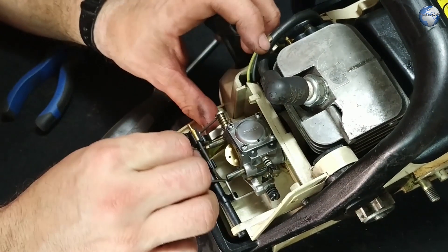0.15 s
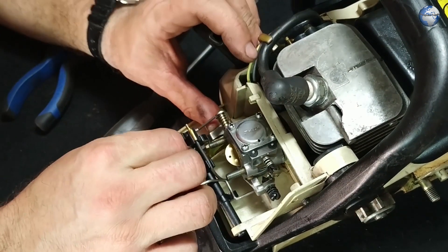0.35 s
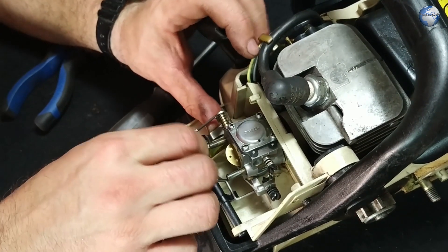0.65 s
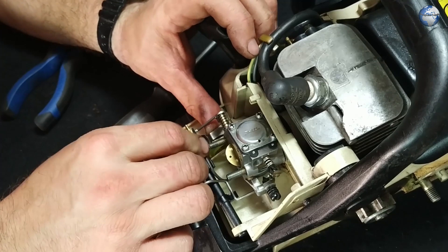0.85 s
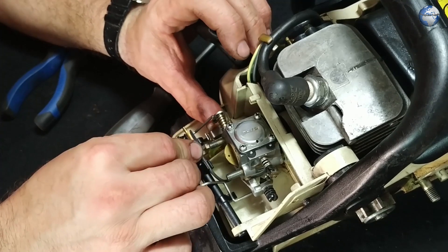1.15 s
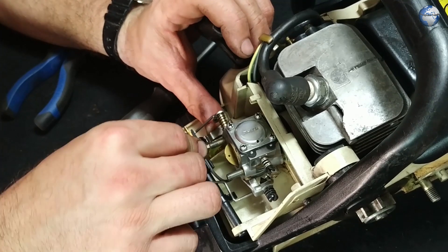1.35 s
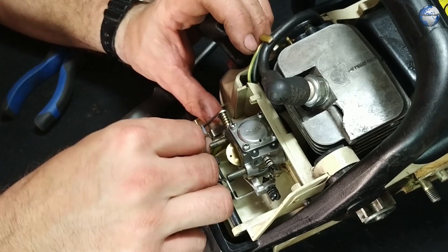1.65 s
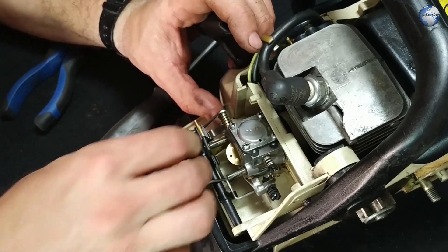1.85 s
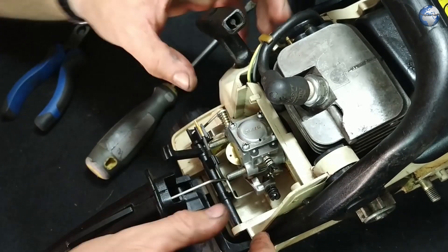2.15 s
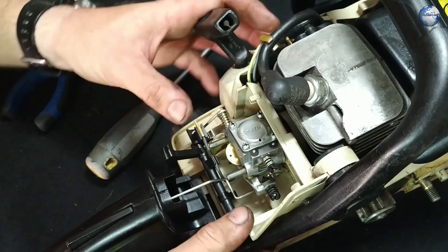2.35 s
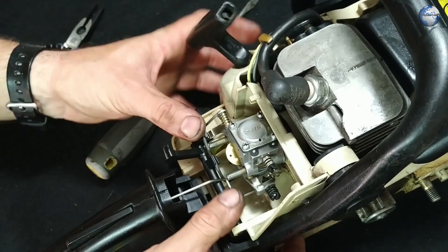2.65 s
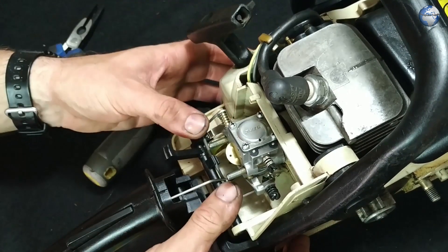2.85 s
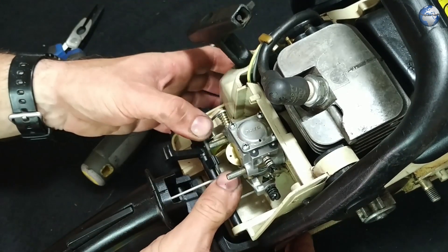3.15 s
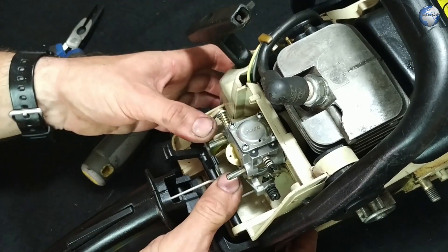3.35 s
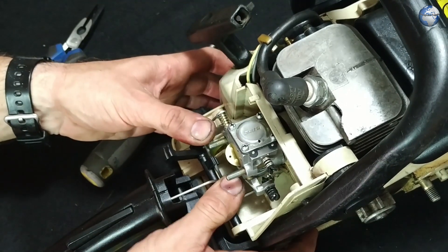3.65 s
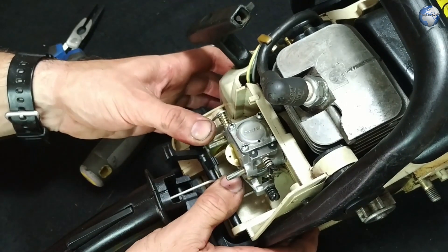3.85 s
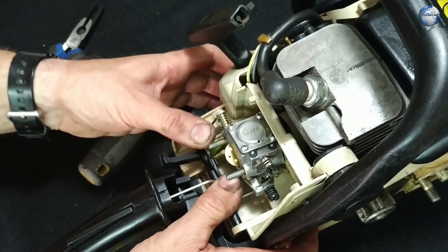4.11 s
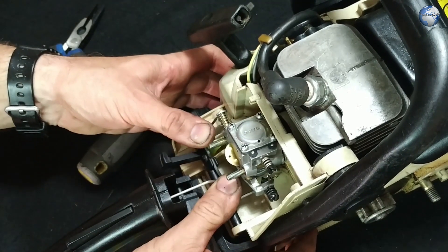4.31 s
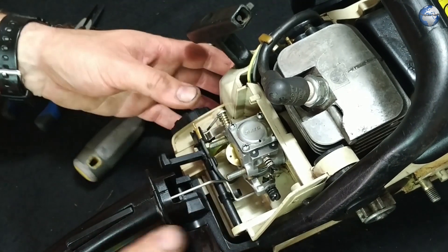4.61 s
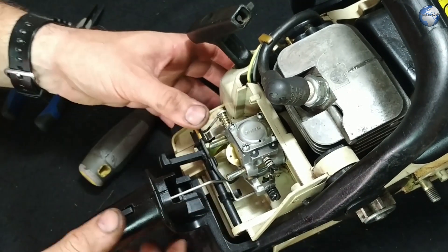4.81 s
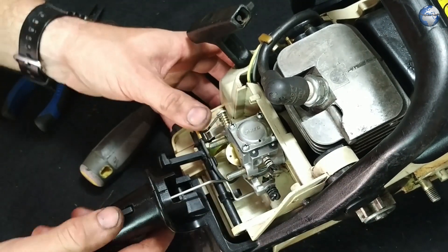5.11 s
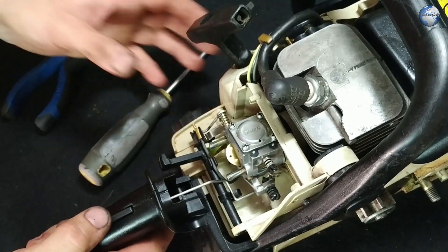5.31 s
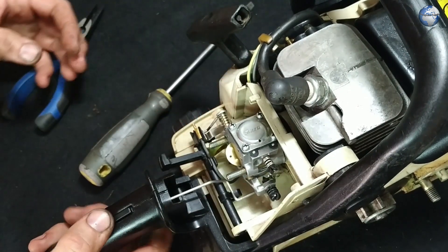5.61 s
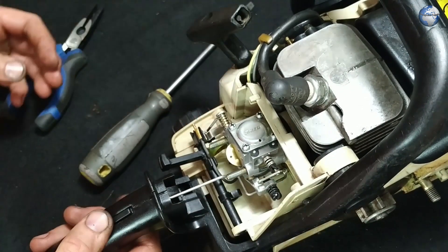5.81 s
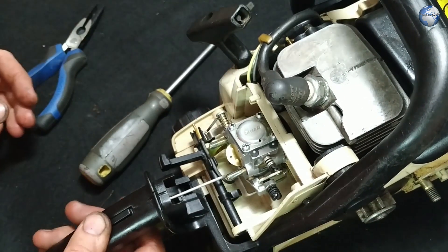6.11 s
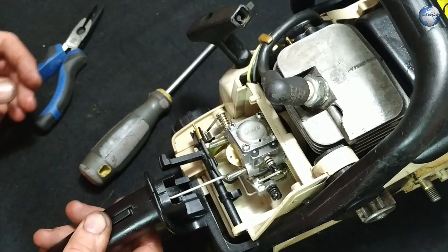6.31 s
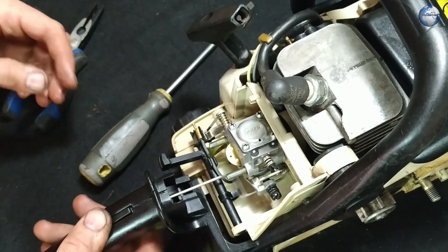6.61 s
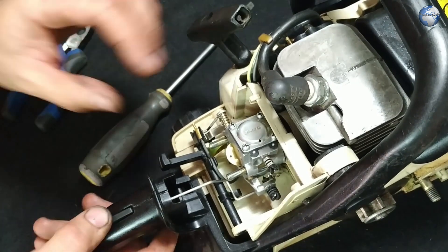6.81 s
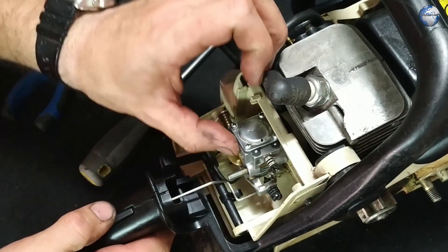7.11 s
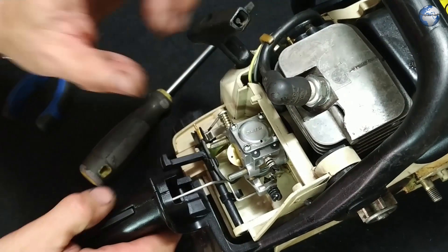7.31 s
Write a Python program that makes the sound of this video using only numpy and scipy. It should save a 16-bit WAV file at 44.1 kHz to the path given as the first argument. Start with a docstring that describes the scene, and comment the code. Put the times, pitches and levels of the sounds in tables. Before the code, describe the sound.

Hands fit small metal and plastic parts to an engine on a matted workshop bench. Crisp clicks and short scraping rattles come first, then about two seconds of faint finger rub and tiny creaks. A loud double clack with a bench thump breaks the quiet, followed by another lull and a dense run of ticks, knocks and rattles. Close stereo microphone, small room with a short echo.

```python
"""Carburettor linkage on a workshop bench

Hands fit the linkage of a small engine's carburettor on a bench mat in a small workshop.
Parts snap and tap on the plastic housing as clicks, knocks and rattles; sliding parts are dense ticks ringing
in the housing's modes. The bench booms under each blow, as noise pushes driving resonators. Fingers rub as
flickering bands of noise and creak as gliding tones; a noise suppressor lowers whatever is very quiet."""
import sys
import numpy as np
from scipy import signal
from scipy.io import wavfile
from scipy.ndimage import uniform_filter1d

SR = 44100
rng = np.random.default_rng(int(sys.argv[2]) if len(sys.argv) > 2 else 0)


def master(y):
    """Save y as 16-bit WAV."""
    cut = np.clip(np.atleast_2d(y).T, -1, 1)
    pcm = np.round(cut * 32767)  # scale
    wavfile.write(sys.argv[1], SR, pcm.astype(np.int16))


N = 328979

# Rubbing fingers and the quiet room, before flicker. Each row: time in seconds, bench rumble in dB,
# low rub in dB, high rub in dB, treble hiss in dB.
QUIET_LEVELS = [(0.0, -82, -55.5, -51.5, -48), (0.17, -90.5, -72.5, -51, -52.5),
                (0.32, -63.5, -91, -68, -72.5), (0.54, -62, -71, -65, -75.5), (0.87, -82, -69, -71, -63.5),
                (1.04, -67.5, -53, -61, -70.5), (1.35, -63, -65.5, -68.5, -69.5),
                (1.62, -51, -68, -72, -71), (1.95, -82.5, -77, -75.5, -64), (2.39, -63.5, -82, -68, -63.5),
                (2.78, -76.5, -99.5, -94, -71), (3.74, -68.5, -93, -101, -76.5),
                (4.15, -74.5, -88.5, -89.5, -74.5), (4.3, -43.5, -47.5, -39.5, -53),
                (4.61, -73.5, -63, -71, -65.5), (5.3, -70.5, -80, -88, -67), (5.88, -63, -86, -81, -75.5),
                (6.38, -57, -77, -72, -61), (6.96, -74, -67, -67, -65), (7.46, -71.5, -85, -98.5, -67.5)]
# Spectrum of the rub. Each row: frequency in Hz, relative level in dB.
RUB_SPECTRUM = [(330, -17.5), (700, -9.5), (1200, -11), (2600, 0), (5500, -9)]
# Likeness of the two microphone ports. Each row: frequency in Hz, left-right correlation.
PORT_LIKENESS = [(100, .95), (250, .85), (600, .5), (1200, 0), (12000, -.1)]
# Reverberation of the workshop. Each row: band centre in Hz, t60 in seconds, relative level in dB.
ROOM_BANDS = [(166, 0.4, 6.5), (460, 0.22, 0.5), (1010, 0.24, -5.5), (2500, .4, -9), (5840, 0.29, -3.5),
              (11300, 0.11, -1.5)]
# Modes of the bench top. Each row: frequency in Hz, relative level in dB, t60 in seconds.
BENCH_MODES = [(68.3, -6, 0.092), (82, 1.5, 0.3), (99, -7, 0.11), (139, -2.5, 0.11)]
# Modes of the engine frame on the mat. Each row: frequency in Hz, relative level in dB, t60 in seconds.
FRAME_MODES = [(82, -6.5, 0.3), (246, -12.5, 0.42), (272, -12, 0.1), (440, -3.5, 0.4), (570, -8.5, 0.06)]
# Modes of the plastic housing. Each row: frequency in Hz, relative level in dB,
# t60 in seconds (before the limit set while it is held).
HOUSING_MODES = [(696, -1, 0.052), (989, 2.5, 0.04), (1420, -4, 0.021), (1916, -6.5, 0.049),
                 (2840, -1.5, 0.0083), (6040, 1.5, 0.0044)]
# Faint creaks. Each row: start in seconds, length in seconds, first pitch in Hz, last pitch in Hz,
# level in dB before the tone and swell shape it.
CREAK_EVENTS = [(2.039, 0.054, 763, 758, -66.5), (2.409, 0.045, 680, 645, -70.5),
                (2.8, 0.12, 1144, 1327, -75.5), (2.825, 0.27, 441, 479, -71.5),
                (2.895, 0.15, 2113, 2390, -80.5), (3.188, 0.097, 945, 613, -75.5),
                (3.214, 0.071, 3020, 2650, -72), (3.243, 0.06, 2080, 1930, -79.5),
                (3.873, 0.13, 1705, 1287, -73.5), (3.878, 0.07, 716, 640, -81.5)]
# Parts sliding and rattling, one row a movement. Each row: loudest moment in seconds, level in dB,
# build-up in seconds, t60 in seconds, highs in dB re level, gain of the lows in dB.
MOVEMENTS = [(0.354, -23, 0.0019, 0.094, -18, 2.5), (0.392, -30, 0.058, 0.33, -24.5, -4.5),
             (1.059, -31.5, 0.0041, 0.055, -28, -3), (1.089, -28, 0.011, 0.29, 0, -1),
             (1.426, -30, 0.0086, 0.16, -3.5, -15.5), (0.891, -36.5, 0.004, 0.06, -4, 7),
             (1.553, -47, 0.0095, 0.2, -2, 5), (1.643, -38.5, 0.015, 0.074, -6.5, 11),
             (1.9, -59, 0.096, 0.13, 2, -16), (2.321, -61, 0.044, 1, -9, -12),
             (2.6, -87, 0.017, 0.31, 27, -8.5), (2.7, -65.5, 0.026, 0.2, 1, -5),
             (3.23, -80, 0.12, 0.46, 16.5, -1.5), (3.495, -49, 0.012, 0.21, -10, 4.5),
             (4.135, -17.5, 0.0095, 0.47, -7.5, -1), (4.19, -20, 0.036, 0.33, -6.5, -2),
             (4.869, -64.5, 0.019, 0.26, -12.5, -5), (4.98, -56, 0.0058, 0.63, -27, -24),
             (5.215, -58.5, 0.013, 0.15, -21.5, 6.5), (5.423, -37.5, 0.011, 0.18, 1, -2.5),
             (5.642, -26, 0.02, 0.14, -9, 1), (5.702, -36, 0.016, 0.26, -3, -10.5),
             (5.88, -36.5, 0.01, 0.35, 0.5, -0.5), (5.947, -33.5, 0.029, 0.065, -9, -10),
             (6.088, -29.5, 0.033, 0.18, -8, -14), (6.124, -33.5, 0.028, 0.16, 5.5, 5),
             (6.274, -35.5, 0.019, 0.11, -3, 7.5), (6.318, -37.5, 0.036, 0.11, 5, 7.5),
             (6.472, -41.5, 0.0055, 0.26, 1.5, 9), (6.537, -37, 0.031, 0.056, 3, -11),
             (6.679, -26, 0.022, 0.27, -2, 0), (7.099, -56.5, 0.0079, 0.27, -27, 7),
             (7.231, -31.5, 0.0078, 0.034, -19.5, 8)]
# Sharp ticks of the metal linkage. Each row: start in seconds, peak in dB, ring in Hz.
LINKAGE_TICKS = [(2.266, -57, 1760), (2.417, -50.5, 2354), (4.166, -11.5, 950), (4.186, -16, 620),
                 (5.646, -27, 2570), (5.702, -23, 3420), (5.754, -31.5, 2740), (5.882, -31.5, 3300),
                 (5.898, -27.5, 3560), (5.94, -30, 2440), (5.961, -31, 1560), (6.093, -17.5, 4100),
                 (6.288, -24, 3400), (6.329, -27, 2380), (6.531, -20.5, 2700)]
# Contacts of parts. Each row: start in seconds, peak of the mids in dB before panning, lows rms in dB re peak,
# highs rms in dB re peak, bench rms in dB, left-right difference in dB, rattle t60 in seconds,
# knock in Hz, hardness from 0 to 1.
CONTACTS = [(0.339, -46.5, 11.5, 18, -50, -1, 0.047, 4500, 0),
            (0.3511, -6, -34, -45, -42.5, 0, 0.032, 1477, 0.99),
            (0.806, -41, -0.5, -9, -65, -9.5, 0.03, 900, 0.02),
            (0.892, -14, -36, -16, -70, -1, 0.049, 3150, 0.99),
            (1.053, -17, -37, -25.5, -52, -1, 0.013, 3130, 0.01),
            (1.09, -9, -15, -18.5, -37.5, -0.5, 0.021, 3020, 0.01),
            (1.116, -31, -18, -2.5, -47, 2, 0.013, 2680, 0.8),
            (1.426, -11.5, -17, -55, -44.5, -4, 0.022, 1340, 0),
            (1.552, -14, -40, -37, -55, -2.5, 0.011, 3460, 0),
            (1.64, -17.5, -12.5, -21.5, -46, -4, 0.045, 1400, 1),
            (1.78, -50, 6, -24, -60, -10, 0.064, 1364, 0.02), (2.16, -46, -7, -12, -54.5, 2, 0.13, 417, 1),
            (2.269, -44.5, -23, -17, -54, -0.5, 0.15, 1350, 0.03),
            (2.694, -43.5, -32, -16.5, -50, -2, 0.06, 2480, 0.4),
            (3.354, -66.5, 13.5, -32.5, -84, -0.5, 0.047, 596, 0.01),
            (3.49, -44, 7.5, -21.5, -54.5, -4, 0.078, 840, 1),
            (3.558, -44, -18, -19.5, -60.5, 1, 0.089, 2650, 0.04),
            (4.123, -22, -39, 7, -35.5, -2, 0.035, 4600, 0),
            (4.135, -8, -8.5, -42, -31.5, -2.5, 0.1, 1460, 0.01),
            (4.423, -39, -1.5, -8.5, -50.5, 1, 0.037, 540, 0),
            (4.977, -40.5, -27.5, -32.5, -71, -2.5, 0.076, 2700, 0.44),
            (5.21, -48, 7, -27, -58, -0.5, 0.06, 773, 0.98),
            (5.424, -13.5, -15.5, -45, -47, -4, 0.02, 990, 0),
            (5.626, -22.5, -15.5, -27, -54, -3, 0.046, 3040, 1),
            (5.638, -23, -28, -22, -43, -2, 0.11, 1900, 0.2),
            (5.667, -10.5, -15.5, -18, -73, -7.5, 0.031, 1870, 1),
            (5.7, -15.5, -12, -38, -51, -5.5, 0.017, 694, 0),
            (5.879, -32, -2.5, -42, -97, -1.5, 0.052, 670, 0),
            (5.897, -12.5, -18, -11.5, -40.5, -6.5, 0.019, 840, 0),
            (5.939, -28, -9.5, -30, -64, -2, 0.023, 1440, 0.6),
            (6.079, -23, -10.5, -16, -43.5, -2.5, 0.12, 677, 0.27),
            (6.12, -9.5, -12, -37, -47, -9, 0.13, 1470, 0.99),
            (6.269, -11, -10, -12, -42.5, -16, 0.2, 1340, 0.96),
            (6.324, -23.5, -30, -14.5, -45.5, -1.5, 0.077, 1950, 0.01),
            (6.345, -17.5, -17.5, -17.5, -75, 0, 0.015, 2750, 0),
            (6.473, -24.5, -6.5, -29, -43, -7.5, 0.099, 630, 0.3),
            (6.514, -17.5, -53, -34, -49.5, -1.5, 0.07, 3030, 0.07),
            (6.529, -29, -6.5, -28, -78, -8.5, 0.048, 2820, 0.5),
            (6.663, -21, -13.5, -53, -45, -3.5, 0.12, 664, 0.97),
            (6.686, -14, -11.5, -13, -55, -2, 0.013, 1900, 0.8),
            (6.945, -47.5, 4, -15, -57.5, -4, 0.062, 537, 0.97),
            (7.096, -54, 5, -27, -63, -2, 0.086, 1770, 1),
            (7.229, -18, -10.5, -31, -65, -11, 0.0061, 1370, 0.3)]

CREAK_BLUR = .07   # cutoff of the roughness as a share of the first pitch
PLASTIC_T60_S = .04   # longest ring of the housing while it is held
GRIP_DB, GRIP_PER_S = 4, 30   # how far and how often the grip changes each mode
BUILD_UP_DB, HIGHS_BUILD_UP_DB = 38.5, 18.5   # climb over one build-up time, for the body and for the highs
HIGHS_T60_RATIO = 0.68   # t60 of the highs as a share of the body's
TICK_CYCLES, KNOCK_CYCLES = 18, 17   # cycles in which each falls by 60 dB
CONTACT_S = .00012   # decay time of a click
KNOCK_MODES, SIDE_MODES_DB = (.54, 1.4), -10   # a mode below and one above the knock, as ratios
CUTOFF_HZ = 16200


def amp(db):
    """Decibels are logarithmic: 20 dB is a factor of ten in gain."""
    return 10 ** (np.asarray(db) / 20)


def rms_one(x):
    """Mean power sets the level: scales to rms 1."""
    return x / np.sqrt(np.mean(x ** 2) + 1e-20)


def in_time(rows):
    """Linear interpolation turns the columns of a table into curves, sample by sample."""
    s, *columns = np.transpose(rows)
    return np.array([np.interp(np.arange(N) / SR, s, c) for c in columns])


def band(x, low_hz, high_hz):
    """Band limitation by a Butterworth band-pass."""
    sos = signal.butter(2, [low_hz, min(high_hz, .45 * SR)], "band", fs=SR, output="sos")
    return signal.sosfilt(sos, x + 1e-18)


def ring(x, hz, t60):
    """Damped resonance: a unit click sets a decaying sine of height 1 ringing."""
    r, w = amp(-60 / (t60 * SR)), 2 * np.pi * hz / SR
    return signal.lfilter([0, np.sin(w)], [1, -2 * r * np.cos(w), r * r], x + 1e-18)


def pair(hz, size):
    """Spatial coherence: white noise whose sides are as alike as two close microphone ports hear that pitch."""
    table = np.transpose(PORT_LIKENESS)
    alike = np.clip(np.interp(np.log(hz), np.log(table[0]), table[1]), -1, 1)
    mid, side = rng.standard_normal((2, size)) * np.sqrt(.5)
    return np.sqrt(1 + alike) * mid + np.sqrt(1 - alike) * side * np.array([[1], [-1]])


def drift(rate):
    """Slow random modulation: straight lines between chance values of spread 1, at most 60 a second."""
    knots = rng.standard_normal(int(N / SR * 60) + 2)
    return np.interp(np.arange(N) * min(rate, 60) / SR, np.arange(len(knots)), knots)


def swell(t, level_db, build_s, climb_db, t60):
    """Exponential growth and decay: a steady climb in dB to the loudest moment at t = 0, then a steady fall."""
    climb = climb_db * t / max(build_s, .001)
    fall = -60 * t / max(t60, .01)
    return amp(level_db + np.where(t < 0, climb, fall))


def quiet():
    """Filtered noise: bench rumble, scuffing fingers and treble hiss, in bands that flicker on their own."""
    rumble_db, low_db, high_db, hiss_db = in_time(QUIET_LEVELS)
    deep = rms_one(band(pair(90, size=N), 46, 110))
    rumble = deep + amp(-10.5) * rms_one(band(pair(200, size=N), 77, 250))

    rub_hz, rub_db = np.transpose(RUB_SPECTRUM)
    edges, rub = np.geomspace(330, 5500, 9), 0
    scuffs = 2.0 * drift(22)
    catches = rng.random(N) < 500 / SR   # skin catches about 500 times a second
    grains = amp(8 * catches * np.minimum(rng.exponential(1, N), 2.5))
    for low, high in zip(edges, edges[1:]):
        hz = np.sqrt(low * high)
        level_db = low_db if hz < 1200 else high_db
        level_db = level_db + np.interp(np.log(hz), np.log(rub_hz), rub_db)
        noise = rms_one(band(pair(hz, size=N) * grains, low, high))
        rub = rub + amp(level_db + scuffs + 4.0 * drift(15)) * noise

    hiss = 0
    for low in 5200 + 1300 * np.arange(8):
        hiss = hiss + amp(2.6 * drift(3.7)) * band(pair(9000, size=N), low, low + 1300)
    rumble = amp(rumble_db + 5.4 * drift(30)) * rms_one(rumble)
    return rub + rumble + amp(hiss_db + .5 * scuffs) * rms_one(hiss)


def workshop(x):
    """Reverberation: reflections build up within a few ms and die band by band, differently at each port."""
    t, echo = np.arange(SR) / SR, 0
    for hz, t60, level_db in ROOM_BANDS:
        echo = echo + amp(level_db - 60 * t / t60) * band(pair(hz, size=SR), hz / 1.8, hz * 1.51)
    echo = echo * np.clip(t / 0.0067 - .3, 0, 1)
    echo = echo / np.sqrt(np.sum(echo ** 2) / 2)
    return signal.fftconvolve(x.mean(axis=0, keepdims=True), echo, axes=1)[:, :N]


def bench():
    """Forced modal vibration: each blow pushes the bench top for some ms and its low modes boom."""
    size = 16384
    out, t = np.zeros((2, N + size)), np.arange(size) / SR
    for s, _, _, _, bench_db, *_ in CONTACTS:
        push = pair(100, size=size) * np.exp(-t / 0.037)   # a little apart on each side
        boom = sum(amp(level_db) * ring(push, hz, t60) for hz, level_db, t60 in BENCH_MODES)
        boom = band(band(boom, 35, 170), 27, 470)
        at = round(s * SR)
        out[:, at:at + size] += amp(bench_db) * boom / boom[:, :2048].std()   # level over the first 46 ms
    return out[:, :N]


def creaks():
    """Amplitude modulation: slow noise roughens a gliding tone under a rounded swell."""
    out = np.zeros((2, N))
    for s, length, from_hz, to_hz, level_db in CREAK_EVENTS:
        low_pass = signal.butter(2, CREAK_BLUR * from_hz, fs=SR, output="sos")
        rough = signal.sosfilt(low_pass, pair(from_hz, size=16384))[:, 4096:]   # past the filter's onset
        at, size = round(s * SR), int(length * SR)
        tone = np.sin(2 * np.pi * np.cumsum(np.linspace(from_hz, to_hz, size)) / SR)
        creak = rms_one(rough)[:, :size] * tone * np.hanning(size) ** 0.24
        out[:, at:at + size] += amp(level_db) * creak
    return out


def housing(ticks):
    """Modal resonance: the ticks ring the plastic's modes, and the shifting grip changes which ones sound."""
    modes = 0
    for hz, level_db, t60 in HOUSING_MODES:
        grip = amp(level_db + GRIP_DB * drift(GRIP_PER_S))
        modes = modes + grip * rms_one(ring(ticks, hz, min(t60, PLASTIC_T60_S)))
    return modes


def slides():
    """Random impulse excitation: uneven ticks ring the housing; heavy movements also shake the frame."""
    sizes = amp(2.5 * np.minimum(rng.exponential(1, (2, N)), 4)) * rng.choice([-1, 1], (2, N))
    ticks = sizes * (rng.random((2, N)) < 9000 / SR) * amp(3 * drift(60))
    clacks = (rng.random(N) < 220 / SR) * rng.uniform(-9, 9, N)   # now and then a harder touch
    ticks = ticks + band(np.array([clacks, np.roll(clacks, 4)]), 850, 6300)

    touch = rms_one(band(ticks, 280, 4100))
    body = rms_one(band(touch + amp(-13.0) * housing(ticks), 600, 4500))
    shared = band(body.mean(axis=0) - body, 160, 1200)   # draws the lows of both ports together
    body = rms_one(body + shared)
    lows = signal.sosfilt(signal.butter(1, 1500, fs=SR, output="sos"), body)
    highs = rms_one(band(ticks, 6600, 14800)) * amp([[1.0], [-1.0]])   # slightly to the left

    out, shakes = np.zeros((2, N)), np.zeros(N)
    for s, level_db, build_s, t60, high_db, low_db in MOVEMENTS:
        near = slice(max(round((s - .3) * SR), 0), round((s + .8) * SR))   # left out further off
        t = np.arange(N)[near] / SR - s
        level = swell(t, level_db, build_s, BUILD_UP_DB, t60)
        sheen = swell(t, level_db + high_db, build_s, HIGHS_BUILD_UP_DB, HIGHS_T60_RATIO * t60)
        out[:, near] += level * (body[:, near] + (amp(low_db) - 1) * lows[:, near])
        out[:, near] += sheen * highs[:, near]
        shakes[near] += level ** 2.77   # strong movements shake far more than weak ones
    shakes = shakes * pair(130, size=N)
    frame = sum(amp(level_db) * ring(shakes, hz, t60) for hz, level_db, t60 in FRAME_MODES)
    return out + amp(-2.0) * frame


def linkage():
    """Impulse excitation: each tick is a gritty touch of a few ms and a short ring at its own pitch."""
    out, touch = np.zeros((2, N)), np.exp(-np.arange(2048) / (0.0011 * SR))
    for s, peak_db, hz in LINKAGE_TICKS:
        click = touch * rng.standard_normal(2048) ** 3   # the cube makes it gritty
        tick = band(click + 0.45 * ring(click, hz, TICK_CYCLES / hz), 560, 7500)
        for side, lag in enumerate(rng.integers(0, 7, 2)):
            at = round(s * SR) + lag
            out[side, at:at + 2048] += amp(peak_db) * tick / np.abs(tick).max()
    return out


def contacts():
    """Impact: a click, a short knock of the part struck and a dying rattle, in lows, mids and highs."""
    out, t = np.zeros((2, N + 4200)), np.arange(4096) / SR
    for s, peak_db, low_db, high_db, _, pan_db, t60, hz, hard in CONTACTS:
        hard = np.clip(hard, 0, 1)
        rise = 1 - np.exp(-t / (0.00023 + 0.21 * (1 - hard)))   # soft contacts swell
        rattle = 0.22 * pair(1400, size=4096) * rise * amp(-60 * t / max(t60, .002))
        side_modes = sum(np.sin(2 * np.pi * k * hz * t) for k in KNOCK_MODES)
        modes = np.sin(2 * np.pi * hz * t) + amp(SIDE_MODES_DB) * side_modes
        knock = hard * 0.28 * modes * amp(-60 * t * hz / KNOCK_CYCLES)
        click = hard * np.exp(-t / CONTACT_S) / (CONTACT_S * SR)

        dull = band(rattle + click + knock, 300, 9200)
        lows, mids = band(dull, 420, 1700), band(dull, 1200, 4500)
        highs = band(rattle + 0.18 * click, 4900, 9100)
        first = slice(0, 512)   # lows and highs are levelled over the first 12 ms
        blow = mids / np.abs(mids).max()
        blow = blow + amp(low_db) * lows / lows[:, first].std()
        blow = blow + amp(high_db) * highs / highs[:, first].std()
        for side, lag in enumerate(rng.integers(0, 7, 2)):   # the path to each port differs by a few cm
            at = round(s * SR) + lag
            out[side, at:at + 4096] += amp(peak_db + pan_db * (2.0 - side)) * blow[side]
    return out[:, :N]


def scene():
    """Superposition: parts close by, their echo in the workshop, bench and quiet sounds."""
    parts = contacts() + linkage() + slides() + creaks()
    return parts + amp(-7) * workshop(parts) + bench() + quiet()


def record(dry):
    """Downward expansion: deep bass is dropped, very quiet sound above the bass is lowered, the top is cut."""
    dry = signal.sosfilt(signal.butter(4, 58, "high", fs=SR, output="sos"), dry)   # the microphone
    bass = signal.sosfilt(signal.butter(2, 300, fs=SR, output="sos"), dry)
    rest = dry - bass
    level_db = 10 * np.log10(uniform_filter1d(np.mean(rest ** 2, axis=0), size=1024) + 1e-14)
    # the noise suppressor works below -61.5 dB and takes off 7 dB at most
    kept = bass + rest * amp(np.clip(1.0 * (level_db + 61.5), -7, 0))
    return signal.sosfilt(signal.cheby2(20, 70, CUTOFF_HZ, fs=SR, output="sos"), kept)


dry = scene()
out = record(dry)
master(out)
```